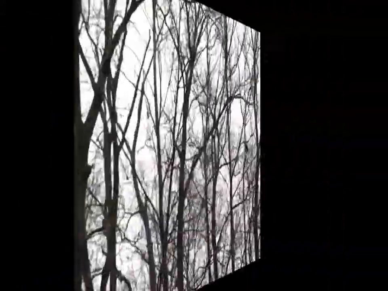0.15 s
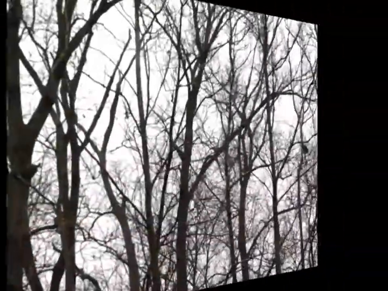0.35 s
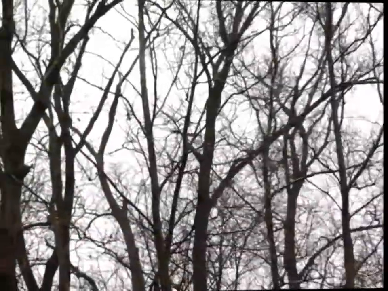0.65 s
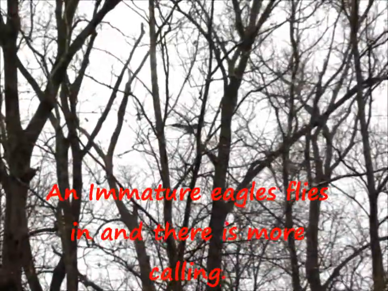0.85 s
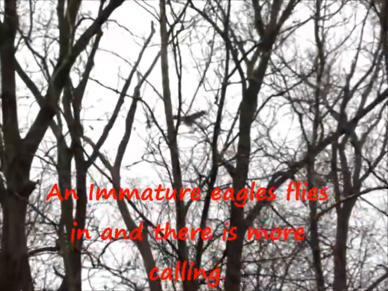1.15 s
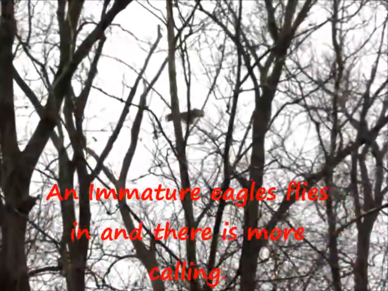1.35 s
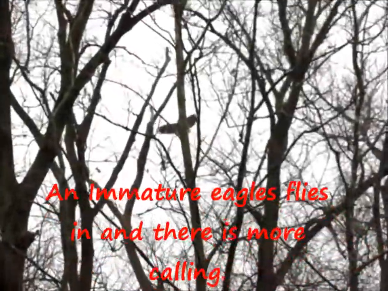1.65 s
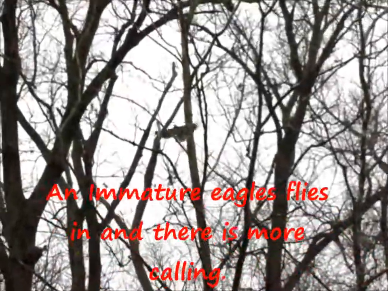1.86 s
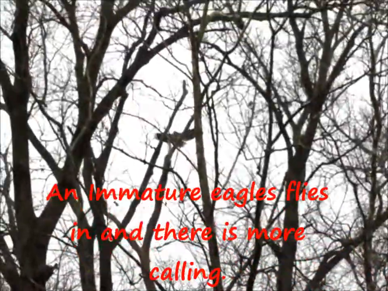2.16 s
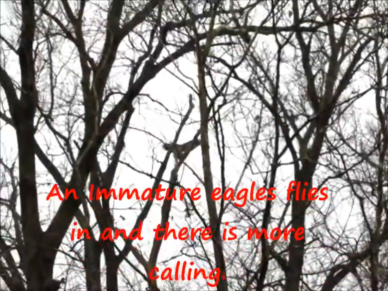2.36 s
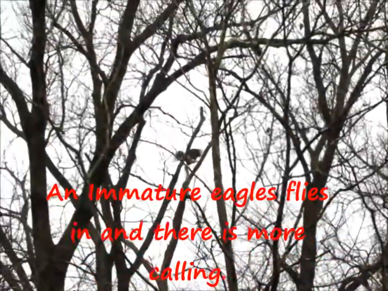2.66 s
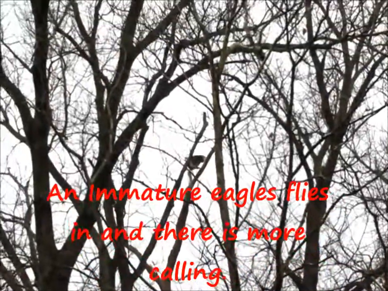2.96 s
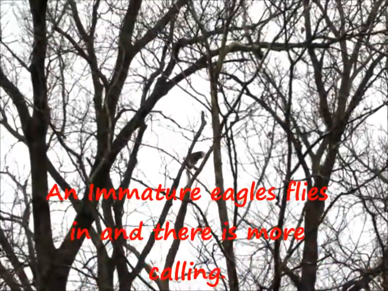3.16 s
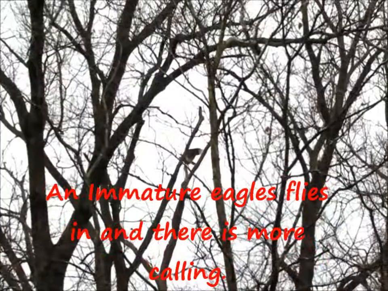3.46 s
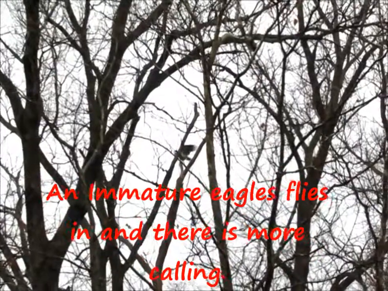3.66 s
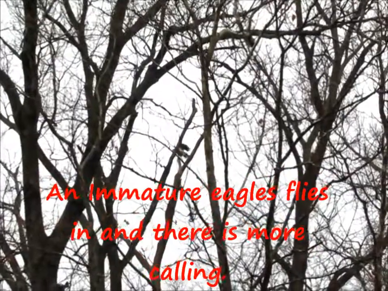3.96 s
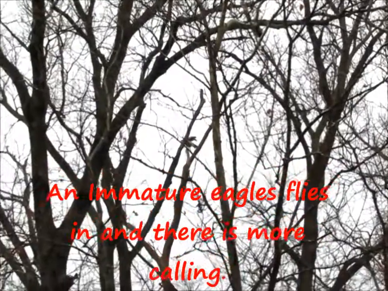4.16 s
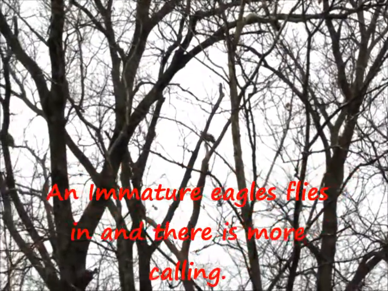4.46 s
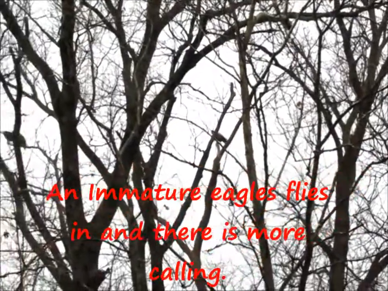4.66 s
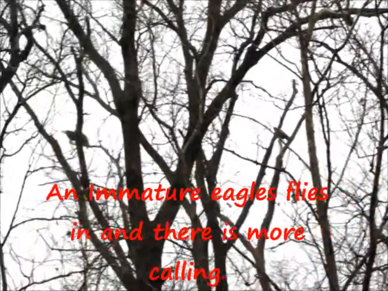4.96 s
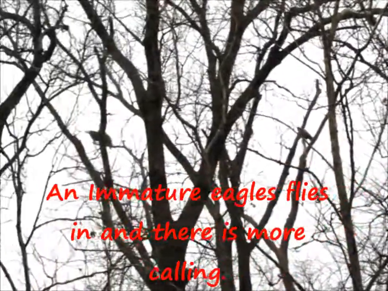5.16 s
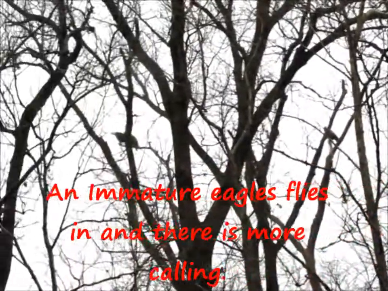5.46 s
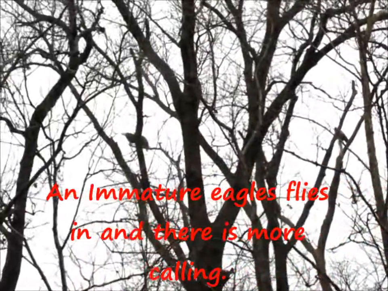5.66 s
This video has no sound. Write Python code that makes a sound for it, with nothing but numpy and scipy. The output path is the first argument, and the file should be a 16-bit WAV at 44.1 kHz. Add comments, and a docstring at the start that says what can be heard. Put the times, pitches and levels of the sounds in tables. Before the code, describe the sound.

Outdoors in a bare, damp wood, a close lens motor whirs for under a second and cuts off. An eagle gives quick piercing yelps from the start, echoing softly among trunks. Small dull creaks and clicks from the handled camera follow. A second eagle chatters in two short runs, with a thin songbird note during the second. Light rain hiss and a faint low drone continue, picked up by a small stereo camera microphone.

```python
"""A close lens motor whirs over a hiss of light rain and a far drone, then stops.
Eagles call from bare trees in a wet wood: one yelps in arching whistles, another chatters in short runs.
The camera's shell creaks under the fingers, and a songbird adds one thin high note.
Bird tones are near-sines with throat-shaped overtones, echoed by decaying noise; creaks are struck
resonances; motor and rain are banded noise, and the drone is noise through narrow resonances."""
import sys
import numpy as np
from scipy import signal
from scipy.io import wavfile

SR = 44100
rng = np.random.default_rng(int(sys.argv[2]) if len(sys.argv) > 2 else 0)


def log_audio(samples):
    """Write samples as a 16-bit WAV file to the path given in sys.argv[1]."""
    # one column per channel
    frames = np.atleast_2d(samples).T
    # limit to full scale, then quantise
    limited = np.clip(frames, -1, 1)
    pcm = np.round(limited * 32767).astype(np.int16)
    wavfile.write(sys.argv[1], SR, pcm)


N = 256220

# Density of the motor's gear noise: hz, level_db_per_hz
MOTOR_SPECTRUM = [(35, -38), (60, -8), (107, -7), (269, -16.5), (1130, -13), (1490, -5.5), (3120, -7.5),
                  (11600, -28), (15000, -54)]
# Resonances the housing adds to the gear noise: centre_hz, width_hz, gain_db
HOUSING_PEAKS = [(843, 146, 6), (1423, 140, 0.5), (3000, 140, -17)]
# Left-right likeness of the motor noise: hz, correlation (-1 to 1)
MOTOR_CORRELATION = [(60, 1), (380, 1), (2380, 0.31), (15000, 0.9)]
# Density of the rain noise: hz, level_db_per_hz
RAIN_SPECTRUM = [(18, -27), (30, -6.5), (59, -6.5), (108, -5.5), (213, -15.5), (277, -18), (560, -18.5),
                 (767, -15.5), (1360, -18.5), (2070, -20), (6040, -27), (15500, -30)]
# Left-right likeness of the rain: hz, correlation (-1 to 1)
RAIN_CORRELATION = [(60, 1), (180, 0.81), (550, 0.35), (1650, 0.51), (4970, 0.083), (15000, 0.16)]
# Levels of the rain hiss and of the drone over time: time_s, rain_db, drone_db
RAIN_DRONE_LEVELS = [(0, -46, -51), (1.55, -46.5, -93), (1.75, -50.5, -56.5), (2.7, -51.5, -51.5),
                     (3.6, -51.5, -56.5), (4.4, -50.5, -57), (5.81, -51.5, -59)]
# Narrow resonances of the drone: centre_hz, width_hz, level_db
DRONE_MODES = [(41.3, 3.8, -40), (85.57, 0.54, -5.5), (110.4, 4.9, 0.5)]
# Yelp gestures; equal times skip a part: start_s, break_s, top_s, slip_s, end_s,
# break_hz, top_hz, slip_hz, break_db, top_db, slip_db, throb (0-1), overtones_db
YELP_GESTURES = [(.176, .176, .266, .282, 0.287, 2108, 2350, 2420, -34.5, -25.5, -30, 0.1, -2.5),
                 (.277, .277, .345, 0.36, .391, 2524, 2585, 2510, -32.5, -33, -29.5, 0.26, 6.5),
                 (0.637, .684, .731, .77, .794, 2160, 2378, 2134, -33, -24, -31.5, 0.3, 0.5),
                 (0.991, 1.02, 1.049, 1.054, 1.054, 2170, 2260, 2100, -46, -23.5, -30, 0.1, -4),
                 (1.054, 1.054, 1.061, 1.076, 1.076, 2360, 2450, 2200, -30, -24, -30, 0.15, -6),
                 (1.074, 1.074, 1.083, 1.101, 1.122, 2430, 2470, 2124, -31, -23.5, -31.5, 0.3, -7),
                 (1.319, 1.345, 1.366, 1.388, 1.408, 2154, 2422, 2030, -31, -25, -31, 0, -4.5),
                 (1.444, 1.467, 1.493, 1.5, 1.508, 2050, 2014, 1880, -32, -38, -40.5, 0.1, -2.5),
                 (1.531, 1.549, 1.56, 1.574, 1.584, 1980, 1975, 1990, -31.5, -28.5, -35, 0.15, 0)]
# Throat gain of overtones against the fundamental in the run-up: overtone_hz, gain_db
RUN_UP_FILTER = [(2600, 4.5), (3200, -8.5), (4700, -24), (6300, -19), (7000, -10)]
# The same in the high part of a yelp: overtone_hz, gain_db
YELP_FILTER = [(3900, -27.5), (4500, -24.5), (5100, -25), (6000, -28), (6600, -22.5), (7300, -32),
               (8000, -43), (9500, -31.5), (10500, -48)]
# Times and strengths of the shell's creaks: start_s, body_db, crack_db, snap_db
CREAK_EVENTS = [(1.17, -30, -49, -70), (1.421, -39, -50, -60), (1.472, -41, -54, -70),
                (1.598, -35.5, -37.5, -35), (1.746, -28.5, -60, -70), (1.814, -42, -64, -70),
                (2.278, -41, -57, -57), (3.978, -54, -68, -48), (4.14, -55, -55, -48),
                (4.336, -56, -62, -52), (4.897, -39.5, -59, -56)]
# Modes of the dull body ring: mode_hz, level_db, t60_s
BODY_MODES = [(271, -13, 0.027), (475, -8, 0.054), (688, -2, 0.025), (880, -8.5, 0.027), (1090, -15, 0.03),
              (1350, -13, 0.025)]
# Modes of the sharp crack: mode_hz, level_db, t60_s
CRACK_MODES = [(310, -3.5, 0.058), (1755, 17.5, 0.011), (3430, 13, 0.0018)]
# Modes of the thin snap: mode_hz, level_db, t60_s
SNAP_MODES = [(6440, -2, .004), (11100, 6.5, 0.0044)]
# Chatter notes: start_s, length_s, start_hz, settled_hz, sag_hz_per_s, level_db, throb (0-1), overtones_db
CHATTER_NOTES = [(2.448, 0.012, 2150, 1770, -3000, -41.5, .1, -24),
                 (2.463, 0.033, 2200, 2214, -2000, -34.5, 0.9, -0.5),
                 (2.539, 0.033, 2510, 2740, 1000, -33.5, 0.54, 0.2),
                 (2.632, 0.029, 2110, 2720, 1500, -34, 0.6, -2),
                 (2.728, 0.033, 2290, 2160, 1004, -38, 0.2, -7),
                 (2.825, 0.018, 1790, 2010, 996, -41, 0.2, -18),
                 (3.88, 0.016, 1630, 1897, -8000, -36.5, .1, -22),
                 (3.895, 0.032, 1890, 2209, -500, -32, 0.5, -4),
                 (3.986, 0.047, 2090, 2828, 4000, -39, 0.3, 3),
                 (4.098, 0.031, 2130, 2738, 2500, -35.5, 0.64, 1.5),
                 (4.216, 0.011, 2110, 2230, 1000, -37.5, .1, -2.5),
                 (4.218, 0.023, 2640, 2635, 1496, -37.5, 0.4, -7),
                 (4.236, 0.012, 2330, 2273, 24994, -37.5, .1, -18),
                 (4.341, 0.016, 2010, 2136, 4000, -34, 0.7, -9.5),
                 (4.478, 0.0094, 1850, 1930, 4000, -42.5, .1, -24)]
# Throat gain of the chatter's overtones against the fundamental: overtone_hz, gain_db
CHATTER_FILTER = [(3600, 6.5), (4400, -20.5), (5500, -10), (6600, -18.5), (8200, -28), (11000, -30),
                  (13000, -52)]
# Songbird's note, one pitch for each side of the syrinx: time_s, low_voice_hz, high_voice_hz, level_db
SONGBIRD_CURVE = [(4.03, 9800, 10000, -63), (4.045, 8130, 8900, -53.5), (4.07, 7580, 8170, -51),
                  (4.1, 7600, 7860, -54), (4.14, 7450, 7900, -47), (4.17, 7490, 8770, -55),
                  (4.205, 7750, 9240, -63)]

MOTOR_STOP_S, MOTOR_DB = 0.704, -35.5   # level before the housing peaks are added

RUN_UP_HZ, RUN_UP_TOP_HZ, RUN_UP_DB, RUN_UP_TOP_DB = 1319, 1647, -46, -34.5   # low voice climbs and swells
RUN_UP_BEND = 0.602   # exponent; under 1 the climb slows down
SWELL_LAG = 2.2   # exponent; over 1 the level climbs later than the pitch
SAG_HZ_PER_S = 2830   # past the top
END_HZ, SLIP_DB_PER_S = 1806, 99   # the falling end
SLIP_GAP_S, FULL_GAP_HZ = 0.0032, 250   # the slip dips the level; a jump this wide nearly cuts it out
YELP_THROB_S, LAST_THROB_S = 0.0164, 0.0026   # throb period; gap from the steady point to the slip
YELP_RASP, CHATTER_RASP = .25, 0.29   # share of the flutter that reaches the fundamental

WOOD_T60_S, WOOD_DB = 0.78, -43.5
UPWARD_HZ, UPWARD_DB = 4400, 1.5   # the yelper's beak points away: trunks get more overtones than the mic

SETTLE_S = 0.0021   # time constant of a chatter note's slide to its pitch
PUFF_S, PUFF_SHARE = 0.0185, 0.96   # puff length; level of each puff against the one before
OPEN_S, CLOSE_S = 0.00072, 0.0038
AFTER_S, AFTER_LENGTH_S, AFTER_DB = 0.0051, 0.0067, -9.5   # delay, length and level of the weak last puff

MIC_LOW_HZ, MIC_TOP_HZ, CUTOFF_HZ = 38.7, 10600, 15650


def amp(db):
    """Decibel law: level to amplitude gain."""
    return 10 ** (np.asarray(db) / 20)


def rms_one(x):
    """Power normalisation to rms 1."""
    return x / np.sqrt(np.mean(x ** 2) + 1e-20)


def in_time(rows):
    """Linear interpolation of every curve column at each sample."""
    s, *columns = np.transpose(rows)
    return [np.interp(np.arange(N) / SR, s, c) for c in columns]


def at_hz(points, hz):
    """Interpolation of a spectrum on a log-frequency axis."""
    table_hz, values = np.transpose(points)
    return np.interp(np.log(hz), np.log(table_hz), values)


def drift(rate_hz):
    """Random modulation: noise through two equal low-pass poles, scaled to rms 1."""
    r = np.exp(-2 * np.pi * rate_hz / SR)
    noise = rng.standard_normal(N + SR)
    return rms_one(signal.lfilter([1], [1, -2 * r, r * r], noise)[SR:])


def resonance(x, hz, width_hz):
    """Two-pole resonance with a gain of about 1 at its peak."""
    r = np.exp(-np.pi * width_hz / SR)
    feedback = [1, -2 * r * np.cos(2 * np.pi * hz / SR), r * r]
    return signal.lfilter([(1 - r * r) / 2, 0, (r * r - 1) / 2], feedback, x)


def banded_noise(spectrum, likeness, white, patchy_db):
    """Third-octave noise synthesis: each band has its own level, flicker and stereo correlation; rms 1."""
    out = 0
    flicker = drift(10.0)
    edges = 25 * 2 ** np.arange(0, 9.5, 1 / 3)
    for k, (low, high) in enumerate(zip(edges, edges[1:])):
        band = signal.butter(2, [low, high], "band", fs=SR, output="sos")
        mid, side = signal.sosfilt(band, white[k % 2])
        hz = np.sqrt(low * high)
        alike = np.clip(at_hz(likeness, hz), -1, 1)
        band_flicker = np.roll(flicker, k * N // len(edges))
        gain = amp(at_hz(spectrum, hz) + patchy_db * band_flicker)
        # mid and side powers set the left-right correlation
        out = out + gain * (np.sqrt(1 + alike) * mid + np.sqrt(1 - alike) * side * [[1], [-1]])
    return rms_one(out)


def motor():
    """Source and resonator: gear noise excites the housing and ends as the motor stops."""
    noise = banded_noise(MOTOR_SPECTRUM, MOTOR_CORRELATION, rng.standard_normal((2, 2, N)), patchy_db=0.0)
    housing = sum(amp(db) * resonance(noise, hz, width) for hz, width, db in HOUSING_PEAKS)
    running = np.clip((MOTOR_STOP_S - np.arange(N) / SR) / 0.0012, 0, 1)
    return amp(MOTOR_DB) * running * (noise + housing)


def rain(level_db):
    """Broadband noise with patchy bands: fine far rain."""
    noise = banded_noise(RAIN_SPECTRUM, RAIN_CORRELATION, rng.standard_normal((2, 2, N)), patchy_db=1.58)
    return amp(level_db) * noise


def drone(level_db):
    """Narrow-band noise: sharp resonances turn noise into wavering low tones."""
    tones = sum(amp(db) * rms_one(resonance(rng.standard_normal(N), hz, width))
                for hz, width, db in DRONE_MODES)
    return amp(level_db) * tones


def weather():
    """Superposition of rain and drone, each following its own level curve."""
    rain_db, drone_db = in_time(RAIN_DRONE_LEVELS)
    return rain(rain_db) + drone(drone_db)


def unsteady(wobble, flutter_db):
    """Random pitch and level modulation: a waver, and a breathy flutter shifted for each harmonic."""
    flutter = flutter_db * drift(130)
    waver = 1 + wobble * drift(240)
    return waver, np.array([np.roll(flutter, k * SR) for k in range(5)])


def syrinx(pitch, db, overtone_db, throat, flutter):
    """Source-filter voice: a near-sine whose harmonics 2-4 are weighted by where they fall in the throat."""
    phase = 2 * np.pi * np.cumsum(pitch) / SR
    overtones = 0
    for k in range(2, 5):
        gain = amp(overtone_db + at_hz(throat, k * pitch) + flutter[k])
        overtones = overtones + gain * np.sin(k * phase)
    return np.sqrt(2) * (amp(db) * np.sin(phase) + overtones)


def run_up(start, end):
    """Rising pitch and level: the low voice climbs and swells until it breaks; rows of s, Hz, dB."""
    share = np.linspace(0, 1, 12)
    s = start + share * (end - start)
    hz = RUN_UP_HZ + (RUN_UP_TOP_HZ - RUN_UP_HZ) * share ** RUN_UP_BEND
    db = RUN_UP_DB + (RUN_UP_TOP_DB - RUN_UP_DB) * share
    return np.transpose([s, hz, db])


def arch(breaks, top, slip, end, break_hz, top_hz, slip_hz, break_db, top_db, slip_db, throb):
    """Register change: a climb to the top, a throbbing sag, then a slip to a falling end; rows of s, Hz, dB."""
    t = np.arange(breaks, end, .001)
    climb = np.sin(np.pi / 2 * np.clip((t - breaks) / (top - breaks), 0, 1)) ** 2
    hz = break_hz + (top_hz - break_hz) * climb - SAG_HZ_PER_S * np.maximum(t - top, 0)
    beat = np.sin(np.pi * (t - slip + LAST_THROB_S) / YELP_THROB_S) ** 4
    swell = amp(break_db) + (amp(top_db) - amp(break_db)) * climb ** SWELL_LAG
    gain = swell * (1 - np.clip(throb, 0, .98) * beat)
    # only a downward jump of pitch opens a gap at the slip
    jump = np.clip((top_hz - SAG_HZ_PER_S * (slip - top) - slip_hz) / FULL_GAP_HZ, 0, .95)
    hz = np.where(t < slip, hz, np.interp(t, [slip, end], [slip_hz, END_HZ]))
    gain = np.where(t < slip, gain, amp(slip_db - SLIP_DB_PER_S * (t - slip)))
    gap = 1 - jump * np.clip(1 - np.abs(t - slip) / SLIP_GAP_S, 0, 1)
    return np.transpose([t, hz, 20 * np.log10(gain * gap)])


def whistle(notes, throat, overtones_db, follow):
    """Partly coupled harmonics: overtones share only part of the fundamental's level changes."""
    out, t = np.zeros(N), np.arange(N) / SR
    waver, flutter = unsteady(wobble=.011, flutter_db=5.0)
    for rows, open_db in zip(notes, overtones_db):
        s, hz, db = np.transpose(rows)
        on = slice(int(s[0] * SR), int(s[-1] * SR))
        # air flow changes evenly, so gain rather than dB is interpolated and throbs are rounded
        level = 20 * np.log10(np.interp(t[on], s, amp(db)))
        edge = np.clip(np.minimum(t[on] - s[0], s[-1] - t[on]) / .005, 0, 1)
        overtone_db = open_db + db.max() + follow * (level - db.max())
        pitch = np.interp(t[on], s, hz) * waver[on]
        fundamental_db = level + YELP_RASP * flutter[0, on]
        out[on] += edge * syrinx(pitch, fundamental_db, overtone_db, throat, flutter[:, on])
    return out


def yelps():
    """Voice registers: a high arch, preceded in some yelps by a low run-up."""
    low = [run_up(start, breaks) for start, breaks, *_ in YELP_GESTURES if breaks - start > .01]
    high = [arch(*row[1:-1]) for row in YELP_GESTURES]
    high_overtones_db = [row[-1] for row in YELP_GESTURES]
    return (whistle(low, RUN_UP_FILTER, np.zeros(len(low)), follow=0.65)
            + whistle(high, YELP_FILTER, high_overtones_db, follow=0.096))


def wood(x):
    """Diffuse scattering: echoes off many trunks as a decaying noise tail, partly different on each side."""
    t = np.arange(int(1.2 * SR)) / SR
    shared, own = rng.standard_normal(len(t)), rng.standard_normal((2, len(t)))
    decay = amp(WOOD_DB - 60 * t / WOOD_T60_S) * np.clip(t / 0.002, 0, 1)
    tail = decay * (0.62 * shared + 0.78 * own)
    return signal.fftconvolve(x[None], tail, axes=1)[:, :N]


def struck(modes, peak_db, slip_s):
    """Modal excitation: each creak is a short uneven slip that rings every damped mode."""
    t = np.arange(int(.015 * SR)) / SR
    slips = rng.standard_normal((len(CREAK_EVENTS), len(t))) * t / slip_s * np.exp(-t / slip_s)
    slips[:, 0] += 0.67 * np.linalg.norm(slips, axis=1)   # a strong first give
    force = np.full(N, 1e-18)
    for (s, *_), db, slip in zip(CREAK_EVENTS, peak_db, slips):
        start = int(s * SR)
        force[start:start + len(t)] += amp(db) * slip / np.linalg.norm(slip)
    out = 0
    for hz, db, t60 in modes:
        r, w = amp(-60 / (t60 * SR)), 2 * np.pi * hz / SR
        out = out + amp(db) * signal.lfilter([0, np.sin(w)], [1, -2 * r * np.cos(w), r * r], force)
    return out


def shell():
    """Superposed mode groups: a dull body ring, a sharp crack and a thin snap per creak."""
    _, body_db, crack_db, snap_db = np.transpose(CREAK_EVENTS)
    body = struck(BODY_MODES, body_db, slip_s=0.0014)
    crack = struck(CRACK_MODES, crack_db, slip_s=0.0016)
    snap = struck(SNAP_MODES, snap_db, slip_s=0.00088)
    return body + crack + snap


def chatter():
    """Pulsed voicing: notes open fast, slide to pitch, throb in puffs and leave a weak last puff."""
    out = np.zeros(N)
    waver, flutter = unsteady(wobble=.009, flutter_db=4.0)
    for s, length, start_hz, hz, sag, db, throb, overtone_db in CHATTER_NOTES:
        t = np.arange(int((length + AFTER_S + AFTER_LENGTH_S) * SR)) / SR
        on = slice(int(s * SR), int(s * SR) + len(t))
        unsettled = np.exp(-t / SETTLE_S)
        pitch = (hz - sag * t + (start_hz - hz) * unsettled) * waver[on]
        between = np.cos(np.pi * np.maximum(t / PUFF_S, .5)) ** 4   # peaks in the dips between puffs
        shape = np.clip(np.minimum(t / OPEN_S, (length - t) / CLOSE_S), 0, 1)
        shape *= (1 - np.clip(throb, 0, 1) * between) * PUFF_SHARE ** (t / PUFF_S)
        shape += amp(AFTER_DB) * np.sin(np.pi * np.clip((t - length - AFTER_S) / AFTER_LENGTH_S, 0, 1))
        fundamental_db = db + CHATTER_RASP * flutter[0, on]
        note_overtone_db = db + overtone_db - 10.0 * unsettled   # overtones grow as the pitch settles
        out[on] += shape * syrinx(pitch, fundamental_db, note_overtone_db, CHATTER_FILTER, flutter[:, on])
    return out


def songbird():
    """Two-source voice: both sides of the syrinx sing rough tones that dip and rise again."""
    low_hz, high_hz, db = in_time(SONGBIRD_CURVE)
    t = np.arange(N) / SR
    voices = 0
    for hz in (low_hz, high_hz):
        roughness = 1 + .5 * drift(250)
        voices = voices + roughness * np.sin(2 * np.pi * np.cumsum(hz) / SR)
    sounding = (t > SONGBIRD_CURVE[0][0]) & (t < SONGBIRD_CURVE[-1][0])
    return amp(db) * voices * sounding


def scene():
    """Superposition of direct bird sound, its scattered echoes, camera noises and weather."""
    yelper, chatterer, singer = yelps(), chatter(), songbird()
    # left and right gains in dB place each direct voice
    near = yelper * amp([[-.7], [.7]]) + chatterer * amp([[-.6], [.6]]) + singer * amp([[-1.5], [1.5]])
    stir = drift(110)   # moving air and swaying boughs smear the pitch of the echoes
    upward = yelper + amp(UPWARD_DB) * resonance(yelper, UPWARD_HZ, 1500)
    far = wood((.6 + .6 * stir) * upward + (1.2 + .5 * stir) * chatterer + amp(11) * singer)
    return near + far + shell() * amp([[.3], [-.3]]) + motor() + weather()


def record(dry):
    """Band limitation: a small microphone fades at both ends, and a steep filter cuts the top."""
    mic_band = signal.butter(2, [MIC_LOW_HZ, MIC_TOP_HZ], "band", fs=SR, output="sos")
    mic = signal.sosfilt(mic_band, dry)
    return signal.sosfilt(signal.cheby2(18, 50, CUTOFF_HZ, fs=SR, output="sos"), mic)


dry = scene()
out = record(dry)
log_audio(out)
```